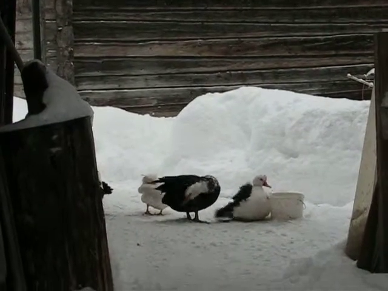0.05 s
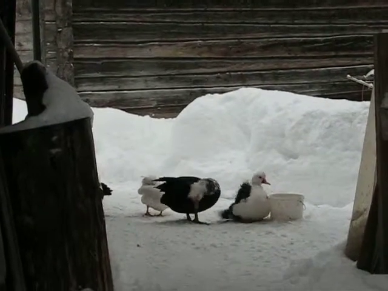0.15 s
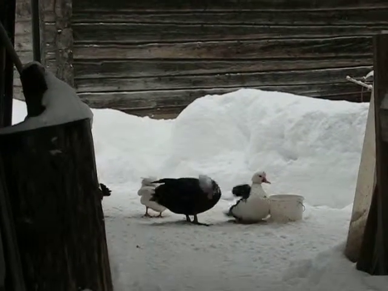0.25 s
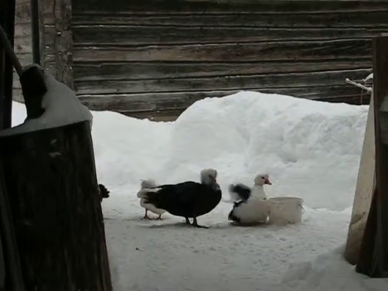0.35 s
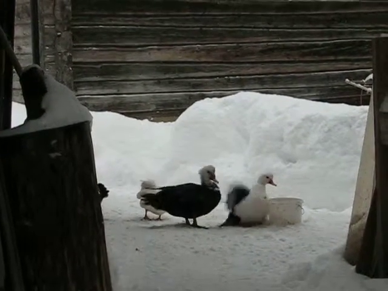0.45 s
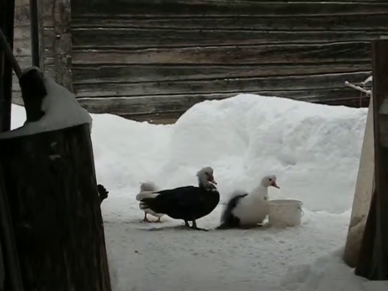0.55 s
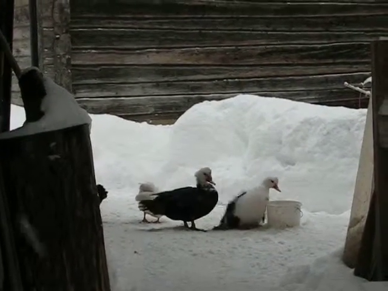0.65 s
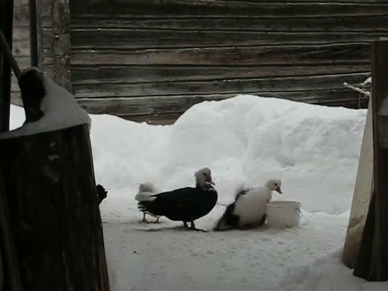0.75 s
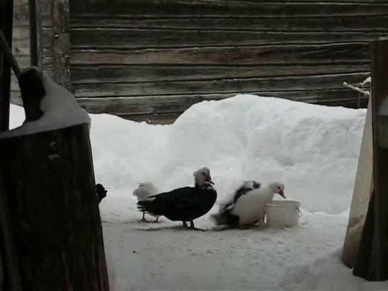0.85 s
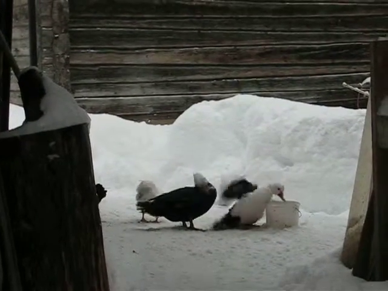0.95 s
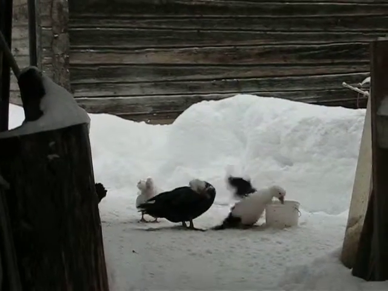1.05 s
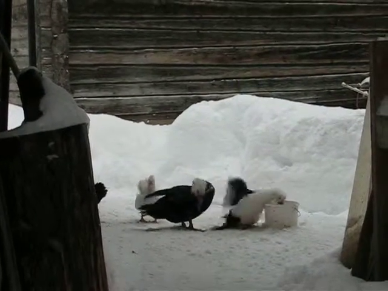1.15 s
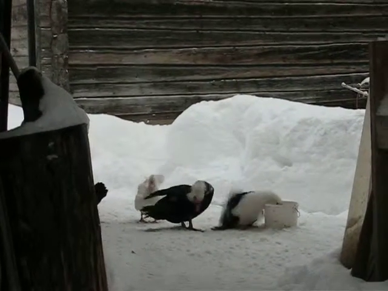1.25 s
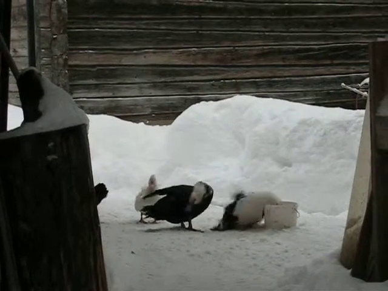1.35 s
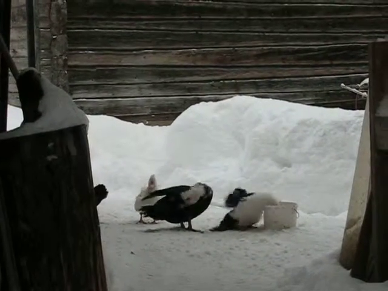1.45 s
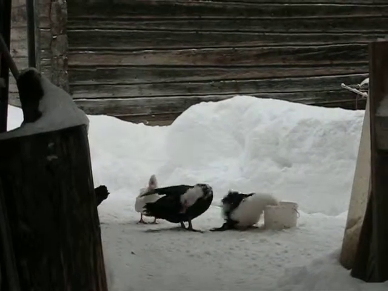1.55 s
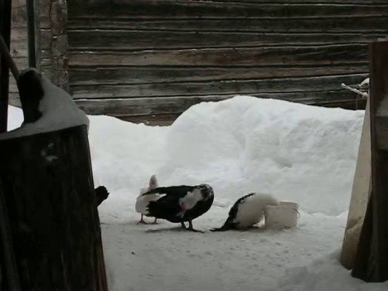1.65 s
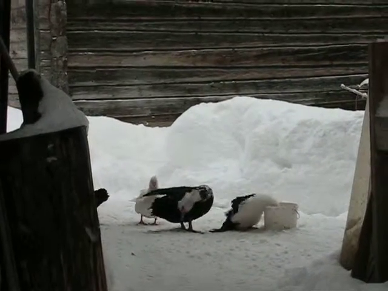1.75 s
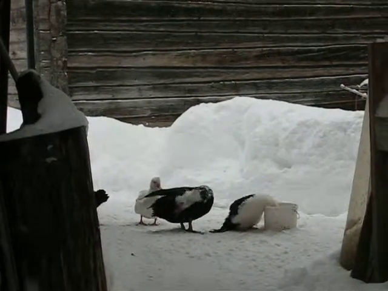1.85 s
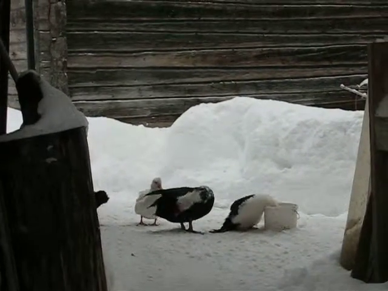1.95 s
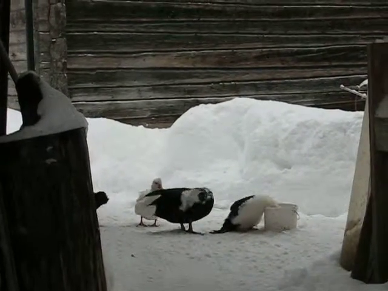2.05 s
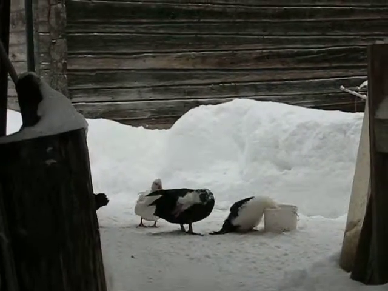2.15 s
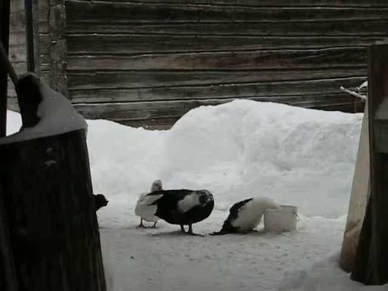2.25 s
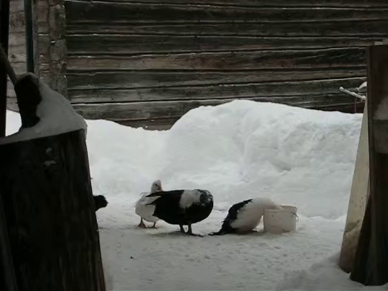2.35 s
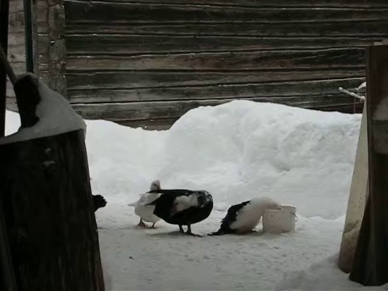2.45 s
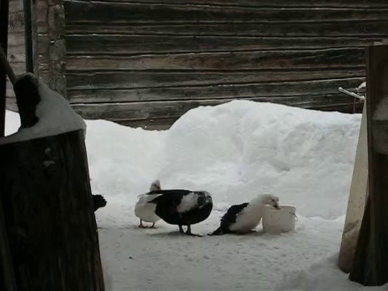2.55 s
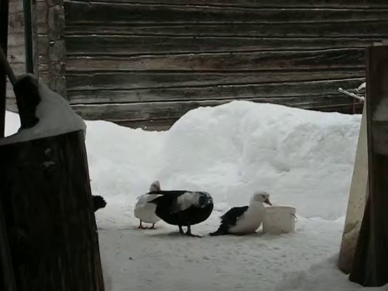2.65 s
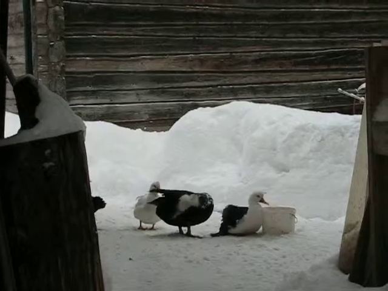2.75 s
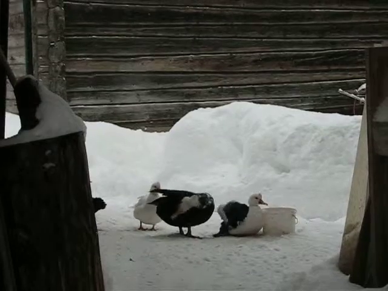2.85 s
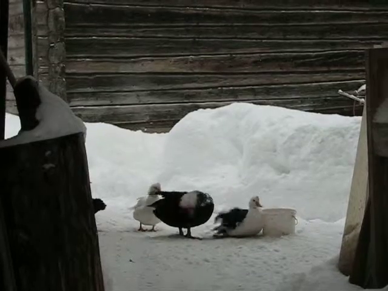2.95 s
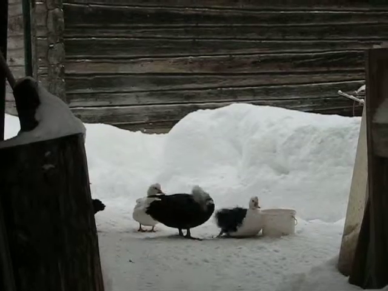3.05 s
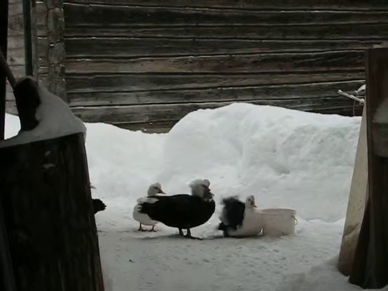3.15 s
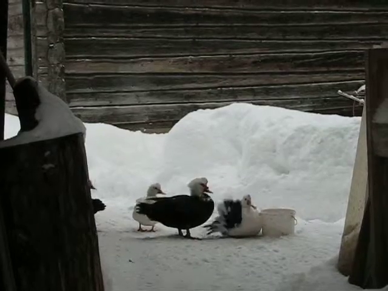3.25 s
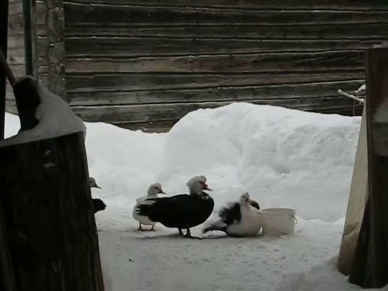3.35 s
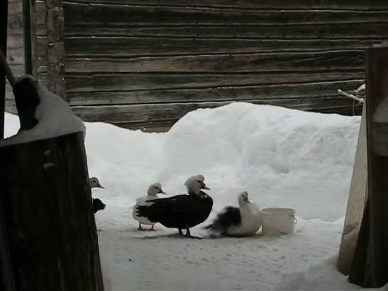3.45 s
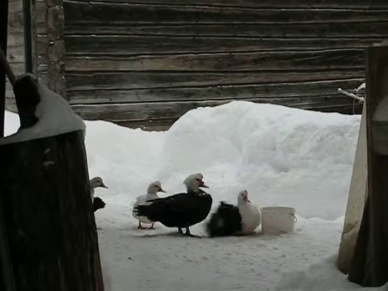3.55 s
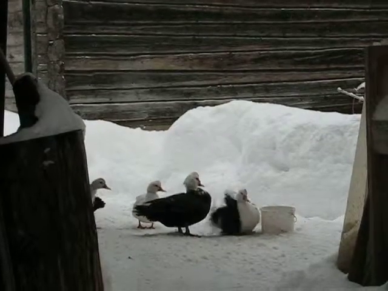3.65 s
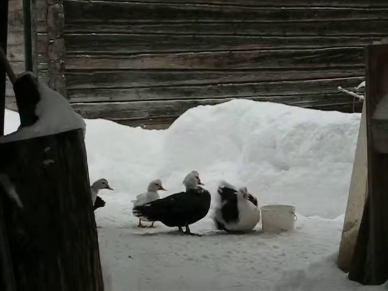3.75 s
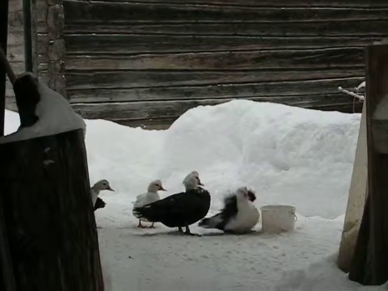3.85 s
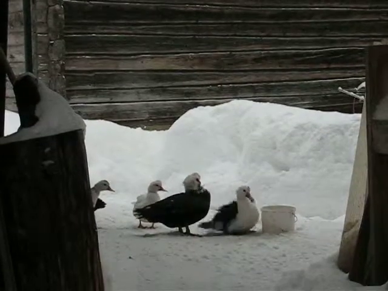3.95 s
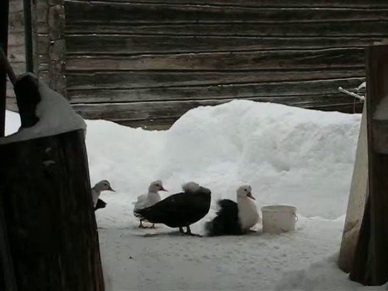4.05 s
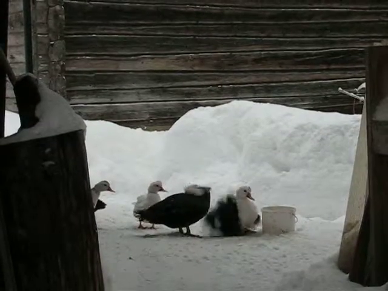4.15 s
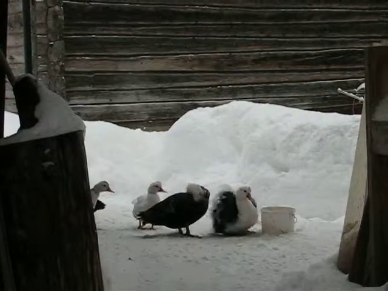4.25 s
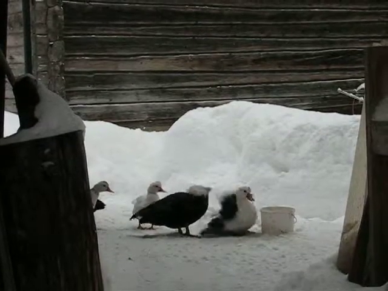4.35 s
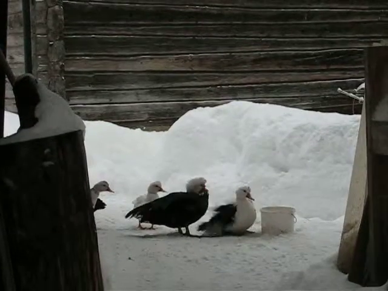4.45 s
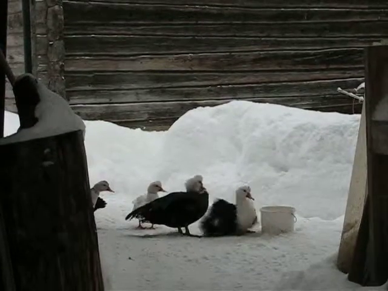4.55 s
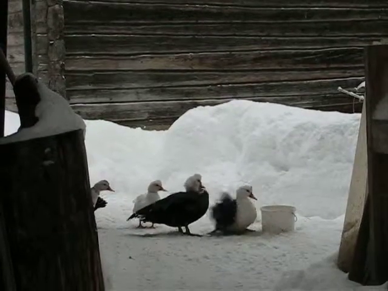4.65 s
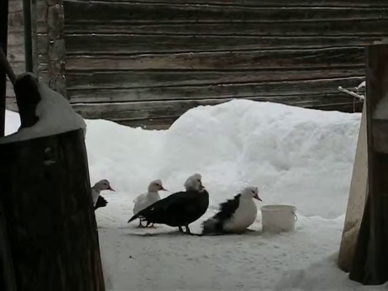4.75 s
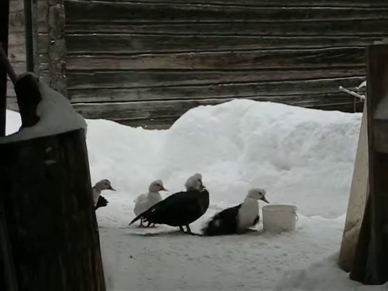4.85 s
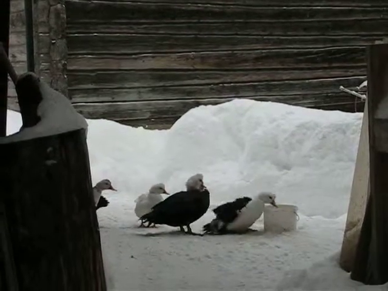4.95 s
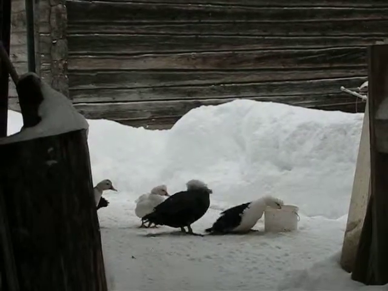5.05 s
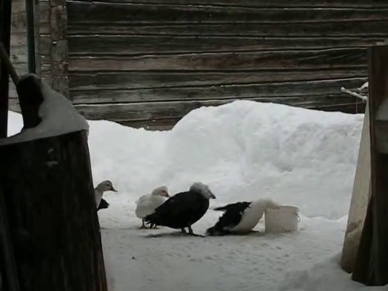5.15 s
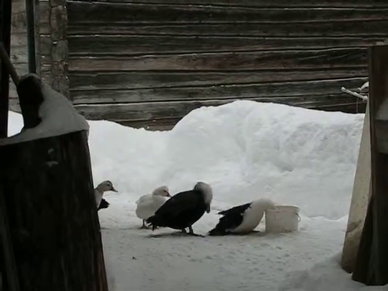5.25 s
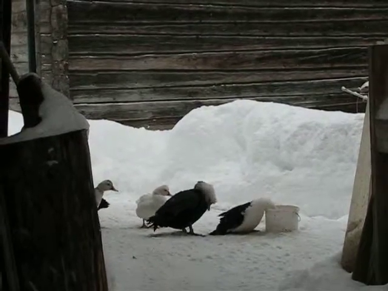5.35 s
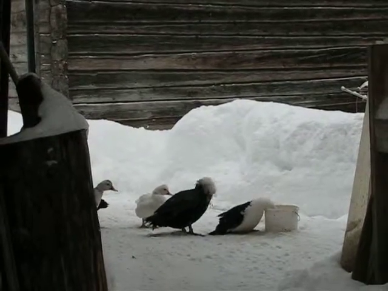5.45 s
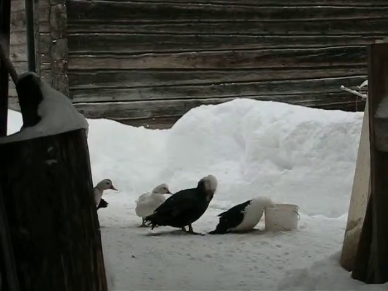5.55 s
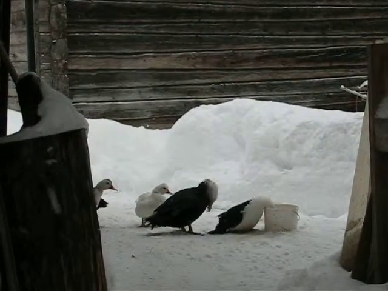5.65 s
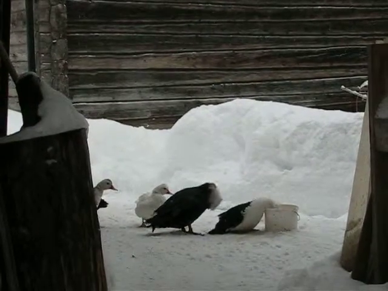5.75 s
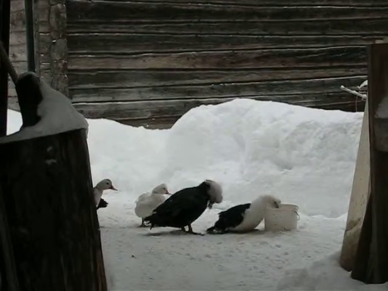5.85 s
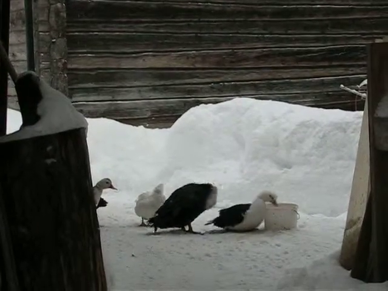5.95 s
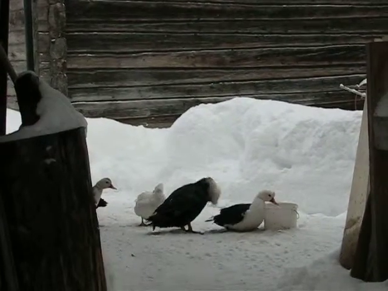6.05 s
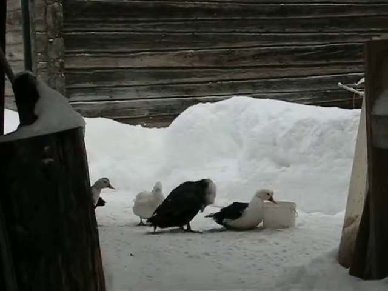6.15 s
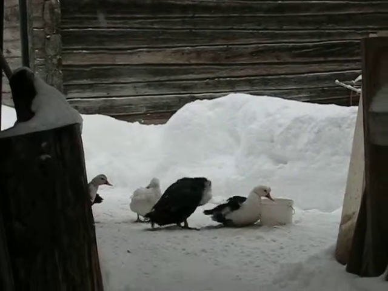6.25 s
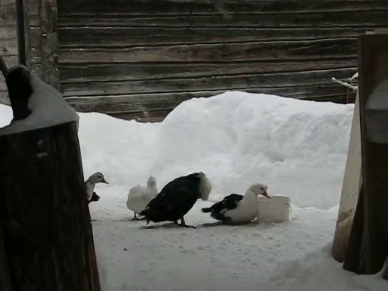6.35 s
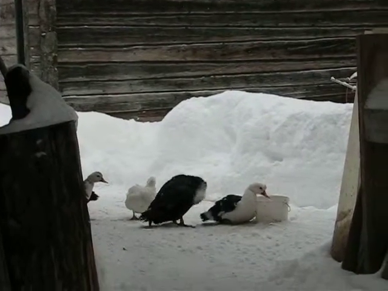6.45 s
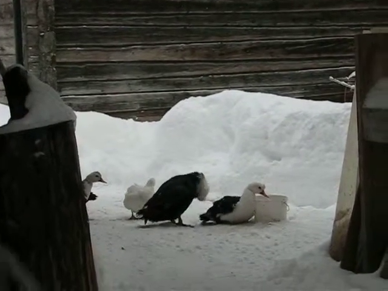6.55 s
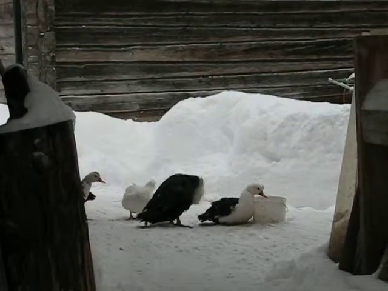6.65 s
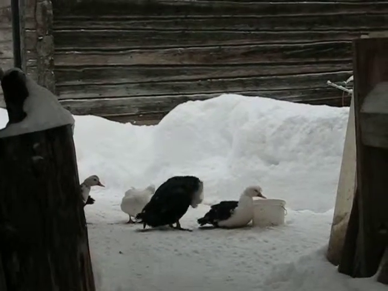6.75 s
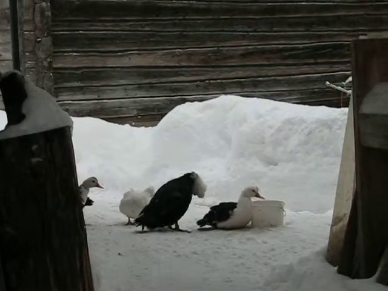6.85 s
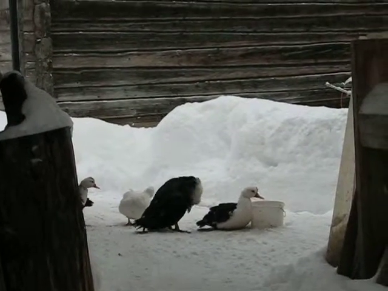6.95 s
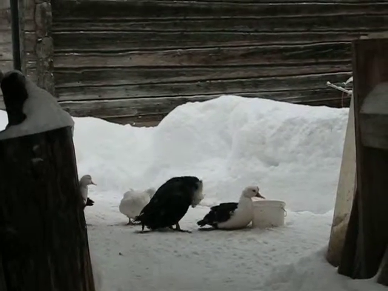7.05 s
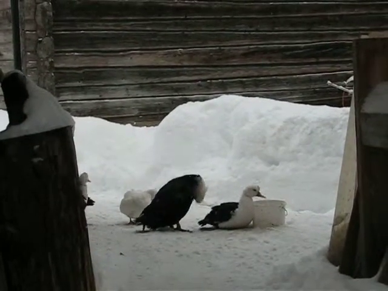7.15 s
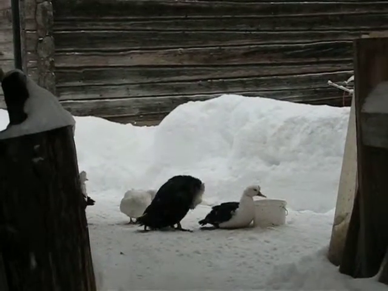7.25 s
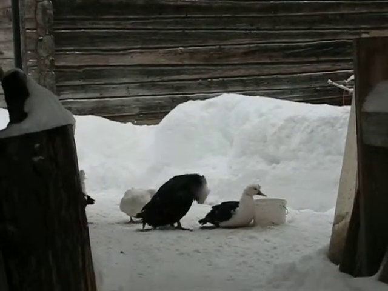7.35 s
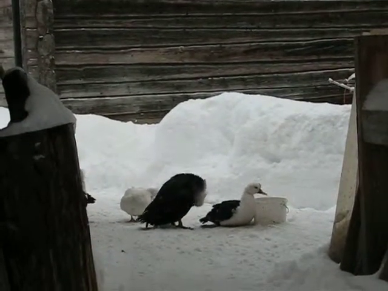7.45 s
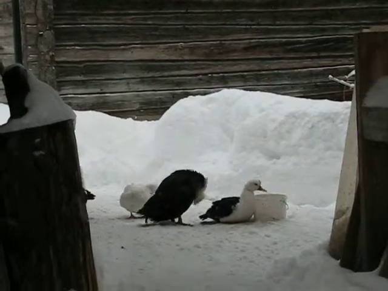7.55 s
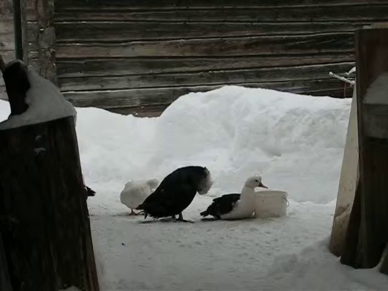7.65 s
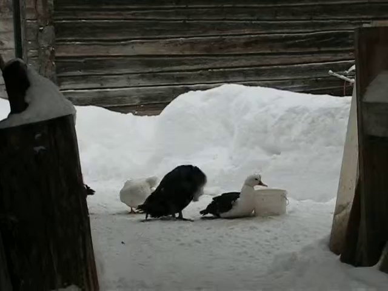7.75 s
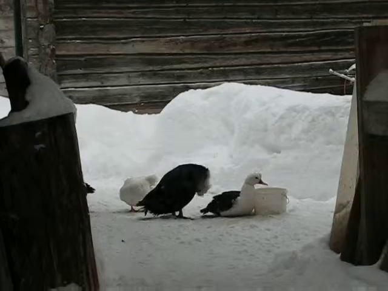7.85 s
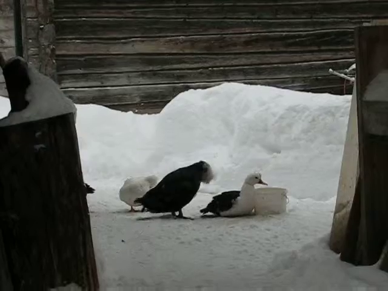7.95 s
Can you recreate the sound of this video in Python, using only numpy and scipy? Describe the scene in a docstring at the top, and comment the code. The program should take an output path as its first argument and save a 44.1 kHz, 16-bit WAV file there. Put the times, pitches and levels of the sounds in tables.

```python
"""Ducks on packed snow before a log wall; a nearly still yard and a faint, thin whine lie under everything.
First one beats its wings eight times a second: each stroke is a burst of feather clicks with a puff of
filtered noise, over a dry rustle, while slaps and snapping quills are short decaying bursts.
Then a bill knocks in a plastic feed tub (damped sines) and nibbles at feathers (band-passed grains).
The plumage is shaken out with further strokes; last come more knocks, light dabbling and three soft peeps."""
import sys
import numpy as np
from scipy import signal
from scipy.fft import rfft, irfft, next_fast_len
from scipy.io import wavfile
from scipy.ndimage import uniform_filter1d, map_coordinates

SR = 44100
rng = np.random.default_rng(int(sys.argv[2]) if len(sys.argv) > 2 else 0)


def transcribe(signal):
    """Save signal, clipped to [-1, 1], as a 16-bit WAV file at the path in sys.argv[1]."""
    frames = np.atleast_2d(signal).T
    limited = np.clip(frames, -1, 1)
    pcm = np.round(limited * 32767).astype(np.int16)
    wavfile.write(sys.argv[1], SR, pcm)


N = 353137
TIME = np.arange(N) / SR  # s

# left-right likeness of the feather sounds: f/Hz, coherence
DUCK_COHERENCE = [(130, 1), (640, 1), (1400, 0.95), (3100, 0.87), (6800, 0.85), (15000, 0.15)]


def amp(db):
    """Level to amplitude: 20 dB is a factor of ten in pressure."""
    return 10 ** (np.asarray(db) / 20)


def unit(x):
    """Normalisation to an rms amplitude of 1."""
    return x / np.sqrt(np.mean(x ** 2) + 1e-20)


def along(points, hz):
    """Interpolation of (f/Hz, value) points on a logarithmic frequency axis, as pitch is heard."""
    f, v = np.transpose(points)
    return np.interp(np.log(hz + 1), np.log(f + 1), v)


def filtered(x, response):
    """Linear filtering: the spectrum of x times a complex response of frequency."""
    m = next_fast_len(N + SR // 2)
    spectrum = rfft(x, m) * response(np.fft.rfftfreq(m, 1 / SR))
    return irfft(spectrum, m)[..., :N]


def coloured(x, spectrum):
    """Minimum-phase filtering: a causal pulse of the given spectrum that keeps the power of white noise."""
    size = 4096
    cepstrum = irfft(np.log(amp(along(spectrum, np.fft.rfftfreq(size, 1 / SR)))))
    # folding the cepstrum onto positive time makes the pulse causal
    cepstrum[1:size // 2] *= 2
    cepstrum[size // 2 + 1:] = 0
    pulse = irfft(np.exp(rfft(cepstrum)))[:size // 2]
    return signal.fftconvolve(x, pulse[None] / np.linalg.norm(pulse), axes=1)[:, :N]


def spread(pair, alike):
    """Interaural coherence: two unrelated signals mixed as sum and difference into left and right."""
    turn = lambda hz: np.arccos(np.clip(along(alike, hz), -1, 1)) / 2
    mid, side = filtered(pair, lambda hz: np.array([np.cos(turn(hz)), np.sin(turn(hz))]))
    return np.array([mid + side, mid - side])


def wobble(rate):
    """Slow random modulation: a smooth curve through `rate` random knots a second."""
    knots = rng.standard_normal(int(N * rate / SR) + 4)
    return map_coordinates(knots, [TIME * rate])


def add(track, s, sound):
    """Superposition: a sound is summed into a track at time s."""
    part = track[max(round(s * SR), 0):][:len(sound)]
    part += sound[:len(part)]


def yard():
    """Stationary background noise: faint outdoor air and hiss, drifting slowly in level."""
    # spectrum of air and hiss: f/Hz, relative level/dB
    yard_spectrum = [(20, -2.5), (90, -2.5), (200, 1), (320, 2.5), (410, 7), (550, -1), (650, 7),
                     (750, 0.5), (870, 4), (1250, -3.5), (3000, -5), (7500, -7), (10000, -11), (16000, -18)]
    # left-right likeness: f/Hz, coherence
    yard_coherence = [(60, 0.64), (180, 0.8), (550, 0.68), (1650, 0.41), (4970, 0.093), (15000, 0.19)]
    air = spread(coloured(rng.standard_normal((2, N)), yard_spectrum), yard_coherence)
    return air * amp(-60 + 0.79 * wobble(1.95))


def whine():
    """Periodic phase reset: one thin sine restarts thirty times a second, which gives it sidebands."""
    tone_hz, restart_hz = 8263, 30
    return np.sqrt(2) * amp(-65.5) * np.sin(2 * np.pi * tone_hz * (TIME % (1 / restart_hz)))


def nook(x):
    """Resonance and diffuse reflection: log wall and snow bank ring low and return a weak, short scatter."""
    # resonances between wall and snow bank: f/Hz, bandwidth/Hz, level re direct sound/dB
    resonances = [(91, 15.6, -0.5), (214, 21, -1), (446, 30, -2), (680.7, 23, 2), (974, 39, -18),
                  (1540, 60, -12), (1766, 35, -11)]
    ring = filtered(x, lambda f: 1 + sum(amp(db) * 1j * f * width / (centre * centre - f * f + 1j * f * width)
                                         for centre, width, db in resonances))
    t = np.arange(SR // 4) / SR
    tail = rng.standard_normal((2, len(t))) * amp(-60 * t / 0.093) * (t > .004)
    scatter = signal.fftconvolve(x, tail / np.linalg.norm(tail[0]), axes=1)[:, :N]
    # long waves arrive alike at left and right
    return ring + amp(-11.5) * spread(scatter, [(200, 0.99), (1500, 0.35), (6000, 0.3)])


def peeps():
    """Tone bursts: short, faint sines under Gaussian envelopes."""
    # soft notes: t/s, level/dB, f/Hz
    notes = [(6.352, -65, 1435), (6.415, -60.5, 2860), (6.452, -65, 2890)]
    track = np.zeros(N)
    for s, db, hz in notes:
        envelope = np.exp(-((TIME - s) / 0.0054) ** 2)
        track += np.sqrt(2) * amp(db) * envelope * np.sin(2 * np.pi * hz * TIME)
    return track


def touches(bouts, gap, db):
    """Irregular succession: rows (t/s, level/dB, f/Hz) of light bill touches, scattered through each bout."""
    scatter_db, scatter_octaves = -1, 0.25  # one standard deviation
    slots = [(s, hz) for start, end, hz in bouts for s in np.arange(start, end, gap)]
    chance = rng.standard_normal((len(slots), 3))
    return [(s + gap * abs(late) / 2, db + scatter_db * loud, hz * 2 ** (scatter_octaves * high))
            for (s, hz), (late, loud, high) in zip(slots, chance)]


def pecks():
    """Damped vibration: bill on feed and tub rings with an overtone, led by a dry noise tick."""
    # firm pecks: t/s, relative level/dB, f/Hz, 60 dB decay time/s, tick level re ring/dB
    firm = [(1.847, -44.5, 440, .011, -14), (2.3126, -40.5, 427, 0.019, -8.5),
            (2.487, -37, 400, 0.017, -9.5), (2.532, -37, 414, .018, -13), (2.6033, -47, 392, 0.029, -11),
            (2.686, -44.5, 390, 0.02, -16), (2.74, -36, 397, 0.014, -9), (2.769, -44, 440, .014, -13),
            (5.0143, -41.5, 400, 0.034, -22), (5.565, -41, 380, .018, -9), (5.9085, -41.5, 414, .013, -15),
            (5.984, -40, 410, 0.0086, -16), (6.2402, -41.5, 1100, .014, -6), (6.5443, -44, 950, 0.019, -12),
            (6.697, -42, 1140, 0.014, -10), (6.8272, -42.5, 1750, 0.0063, 3),
            (6.8955, -39.5, 520, .009, -10), (7.155, -44.5, 735, 0.011, -12),
            (7.2785, -43, 780, 0.0076, -12), (7.378, -37, 1170, .018, -10.5),
            (7.4264, -42, 1710, .012, -14), (7.4348, -40, 940, 0.057, -3)]
    # light dabbling: start t/s, end t/s, typical f/Hz
    dabble_bouts = [(5.3, 8.0, 700)]
    gap_s, dabble_db, dabble_t60_s, dabble_tick_db = .14, -48.5, 0.0093, -10
    knocks, ticks, t = np.zeros(N), np.zeros(N), np.arange(SR // 15) / SR
    dabbles = [(*touch, dabble_t60_s, dabble_tick_db) for touch in touches(dabble_bouts, gap_s, dabble_db)]
    for s, db, hz, t60, tick_db in firm + dabbles:
        ring = np.sin(2 * np.pi * hz * t) + 0.23 * np.sin(2 * np.pi * hz * 1.4 * t)
        add(knocks, s, amp(db - 1 - 60 * t / t60) * ring)
        add(ticks, s, amp(db + tick_db + 4.0 - 60 * t / .008) * rng.standard_normal(len(t)))
    # the small tub radiates no bass
    knocks = filtered(knocks, lambda hz: (1j * hz / (130 + 1j * hz)) ** 2)
    tick_spectrum = [(100, -0.5), (600, 6.5), (1700, 3.5), (4500, -4), (6500, -29), (16000, -35)]
    return knocks + coloured(ticks[None], tick_spectrum)[0]


def barbs(rate, size_db, smooth_db):
    """Stick-slip: barbs slide over each other in a stream of tiny, uneven clicks on a smooth hiss."""
    sizes = amp(size_db * np.minimum(rng.exponential(size=N), np.pi))
    clicks = (rng.random(N) < rate / SR) * sizes
    rough = unit(clicks * rng.standard_normal((2, N)))
    return unit(rough + amp(smooth_db) * rng.standard_normal((2, N)))


def preening():
    """Band-passed friction noise: each nibble is a soft, grainy swish around its own pitch."""
    # bill drawn firmly through the feathers: t/s, relative level/dB, centre f/Hz
    draws = [(1.976, -57.5, 5300), (2.24, -54.5, 4700), (2.48, -58, 5000), (2.548, -53, 5140),
             (2.768, -54.5, 5770), (6.235, -60, 6950), (6.39, -59, 4430)]
    # light nibbling: start t/s, end t/s, typical centre f/Hz
    nibble_bouts = [(1.8, 2.9, 4900), (5.2, 6.8, 3380)]
    gap_s, nibble_db = .2, -65.5
    track, t = np.zeros(N), np.arange(-SR // 20, SR // 20) / SR
    octaves = lambda hz: np.log2((np.fft.rfftfreq(len(t), 1 / SR) + 1) / hz)
    grain = barbs(rate=1700, size_db=7, smooth_db=1.0)[0]
    for s, db, hz in draws + touches(nibble_bouts, gap_s, nibble_db):
        band = (1 + (octaves(hz) / 1.55) ** 2) ** 3.2
        swish = irfft(rfft(grain[round(s * SR):][:len(t)]) / band, len(t))
        add(track, s + t[0], amp(db - 1.5) * unit(swish) / np.cosh(t / 0.0091))
    return track


def snaps():
    """Elastic release: a quill springs free in a rough click of a few cycles."""
    # single quills flicking past each other: t/s, relative level/dB, f/Hz
    flicks = [(0.5426, -18.5, 5240), (0.7292, -27, 4260), (0.7809, -10.5, 6900), (1.5074, -24, 3020),
              (1.609, -23, 6900), (2.233, -36.5, 6500), (4.1015, -28, 6800), (4.2293, -25, 5800),
              (4.386, -26, 3300), (4.521, -28, 3300), (4.933, -22.5, 3500), (6.789, -39.5, 4300)]
    low_hz, top_hz = 1860, 10500  # the band in which a thin quill clicks
    track, t = np.zeros(N), np.arange(SR // 50) / SR
    for s, db, hz in flicks:
        click = np.sin(2 * np.pi * hz * t) + .5 * rng.standard_normal(len(t))
        add(track, s, amp(db + 4 - 60 * t / .003) * (1 - np.exp(-t / .00012)) * click)
    return filtered(track, lambda hz: 1 / (1 + (hz / top_hz) ** 6 + (low_hz / (hz + 1)) ** 4))


def pressure(times, levels, rise, t60, tail_db, tail_t60):
    """Energy summation: contacts swell, collapse and trail off as feathers slide on; their powers add."""
    power, lead = np.zeros(N), SR // 20
    t = np.arange(-lead, SR // 4) / SR
    after = np.maximum(t, 0)
    swell = amp(60 * np.minimum(t, 0) / rise)
    shape = swell * (amp(-60 * after / t60) + amp(tail_db - 60 * after / tail_t60))
    for s, db in zip(times, levels):
        add(power, s - lead / SR, (amp(db) * shape) ** 2)
    return np.sqrt(power)


def slaps():
    """Impact: the flat of the wing lands with a hard pat (damped sine) and a dull crunch (grainy noise)."""
    # wing striking snow or body: t/s, relative level/dB
    landings = [(0.242, -56), (0.526, -46), (0.636, -41.5), (0.7561, -37), (0.86, -37), (0.9897, -39.5),
                (1.1009, -38), (1.23, -38.5), (1.508, -44.5), (3.765, -44.5), (4.193, -46), (4.386, -42),
                (4.595, -40.5)]
    # spectrum of the crunch: f/Hz, relative level/dB
    crunch_spectrum = [(60, -4.5), (200, -3.5), (600, -2.5), (1000, 1), (1300, -8), (1700, -3.5),
                       (2900, -2.5), (4500, -11.5), (8000, -14), (16000, -37)]
    times, levels = np.transpose(landings)
    pats, t = np.zeros(N), np.arange(SR // 30) / SR
    for s, db in landings:
        hz = 1000 * np.exp(.15 * rng.standard_normal())
        add(pats, s, amp(db + 6 - 60 * t / .012) * np.sin(2 * np.pi * hz * t))
    blow = pressure(times, levels + 2, rise=.001, t60=0.015, tail_db=-3.5, tail_t60=0.16)
    crunch = coloured(blow * barbs(rate=3000, size_db=-0.5, smooth_db=0), crunch_spectrum)
    return pats + spread(crunch, DUCK_COHERENCE)


def strokes():
    """Contact sequence: each beat gives two claps, a slide and an upstroke (t/s, crackle/dB, air puff/dB)."""
    # wingbeats: t/s, crackle level/dB, air puff level/dB, second wing's lag t/s,
    # its crackle level/dB, upstroke crackle level/dB (all levels relative)
    beats = [(0.32, -44, -45.5, 0.016, -37.5, -42.5), (0.4313, -37, -40.5, 0.014, -35, -45),
             (0.536, -35.5, -36.5, 0.019, -32, -55), (0.665, -29.5, -40, 0.016, -37, -47),
             (0.78, -29.5, -39, 0.0086, -28.5, -60), (0.8943, -26, -37.5, 0.0094, -31, -55),
             (1.015, -27.5, -38.5, .006, -35, -54), (1.1349, -27, -34, 0.007, -35, -44),
             (1.2555, -28.5, -35, 0.0063, -29, -48), (1.3853, -33.5, -40.5, 0.0062, -33, -42),
             (1.529, -49, -46, 0.0213, -47, -49), (3.2571, -46, -51, 0.027, -42, -52),
             (3.379, -42.5, -60, 0.029, -43.5, -59), (3.4643, -49, -49.5, 0.023, -42.5, -43),
             (3.589, -49, -41, 0.036, -39, -47), (3.7, -42.5, -44, 0.0059, -39.5, -41),
             (3.828, -44, -39.5, 0.029, -38, -44), (3.9487, -40, -36, .036, -39, -45.5),
             (4.0739, -34.5, -34.5, 0.0272, -33, -44), (4.197, -39.5, -37, 0.034, -33.5, -36.5),
             (4.321, -40, -36.5, 0.017, -33.5, -51), (4.4657, -32.5, -33, 0.016, -37, -40.5),
             (4.5979, -40, -43.5, 0.0072, -40, -52), (4.7094, -48, -41.5, 0.023, -43.5, -49),
             (4.869, -65, -53, 0.035, -49, -54)]
    spill_db_per_s = 260  # the later the second wing, the less air is left for it to push
    slide_s, slide_db = 0.0198, -8.5  # the wings then slide off the flank: delay, level re second clap
    upstroke_s, upstroke_air_db = .068, -16.5  # they brush past again: delay, air puff re its crackle
    rows = []
    for s, crackle_db, puff_db, lag, second_db, up_db in beats:
        left_db = puff_db - spill_db_per_s * lag
        rows += [(s, crackle_db, puff_db), (s + lag, second_db, left_db),
                 (s + lag + slide_s, second_db + slide_db, left_db + slide_db),
                 (s + upstroke_s, up_db, up_db + upstroke_air_db)]
    return rows


def thumps():
    """Volume displacement: each contact shoves the air in a soft, low push at its own random pitch."""
    track, t = np.zeros(N), np.arange(SR // 10) / SR
    contacts = strokes()
    pitches = 200 * np.exp(.17 * rng.standard_normal(len(contacts)))
    for (s, _, db), hz in zip(contacts, pitches):
        push = np.sin(2 * np.pi * hz * t) * (1 - np.exp(-t / .005)) * amp(-60 * t / .04)
        add(track, s - .003, amp(db + 4) * push)
    # air slips round the wing, so the deepest bass cancels
    return filtered(track, lambda hz: (1j * hz / (75 + 1j * hz)) ** 2)


def ruffle():
    """Amplitude envelopes: gains of rustle and stirred air, silent outside the bouts of motion."""
    # one curve for each bout: t/s, rustle relative level/dB, stirred air relative level/dB
    bouts = [
        [(0, -64, -53.5), (.15, -55.5, -55), (.31, -53, -53), (.56, -47, -50.5), (.73, -47, -49),
         (1.24, -49, -54.5), (1.45, -53, -54), (1.6, -56, -73), (1.8, -70, -83)],
        [(2.68, -62.5, -84), (3.05, -54.5, -65), (3.6, -47.5, -55.5), (4.09, -46.5, -56), (4.3, -44.5, -55),
         (4.66, -47.5, -55.5), (4.84, -54.5, -61.5), (4.96, -53, -69), (5.08, -69.5, -78)],
    ]
    gains = np.zeros((2, N))
    for bout in bouts:
        s, *levels = np.transpose(bout)
        gains += [amp(np.interp(TIME, s, db, left=-np.inf, right=-np.inf)) for db in levels]
    return gains


def patchy(x, depth_db):
    """Spectral variation: feathers differ in colour, so random gains span a kilohertz and milliseconds."""
    z = signal.stft(x, nperseg=128)[2]
    field = rng.standard_normal(z.shape[1:])
    field = uniform_filter1d(field, size=3, axis=0)
    field = uniform_filter1d(field, size=5, axis=1)
    return unit(signal.istft(z * amp(depth_db * unit(field)), nperseg=128)[1][:, :N])


def wings():
    """Friction and air flow: strokes crackle in the vanes and puff air; loose feathers rustle in between."""
    # spectrum of the vanes: f/Hz, relative level/dB
    feather_spectrum = [(300, -43), (800, -18.5), (1250, -14.5), (1700, -5.5), (2030, -9), (2500, -3.5),
                        (3200, -2), (4900, -6), (6000, -2), (6900, 2), (8000, -4), (9500, -13),
                        (12500, -18.5), (16000, -24)]
    # spectrum of the moved air: f/Hz, relative level/dB
    air_spectrum = [(20, -19), (55, -16), (95, -8), (125, -11.5), (165, -4.5), (210, -4.5), (290, -5),
                    (600, -9.5), (1000, -8), (1300, -16.5), (3000, -14), (8000, -84)]
    s, crackle_db, puff_db = np.transpose(strokes())
    rustle, stir = ruffle()
    clap = pressure(s, crackle_db + .5, rise=.014, t60=.018, tail_db=-9, tail_t60=.14)
    puff = pressure(s, puff_db - 4.5, rise=0.046, t60=0.078, tail_db=-23.5, tail_t60=0.093)
    grain = barbs(rate=2500, size_db=3, smooth_db=0)
    loose = amp(-1.2 + 1.53 * wobble(70)) * rustle * patchy(grain, depth_db=3)
    # the rustle has its own treble tilt
    tilt = [(1000, -2.8), (3000, 0.5), (8000, 2.0), (12000, 1.5)]
    loose = filtered(loose, lambda hz: amp(along(tilt, hz)))
    crackle = clap * patchy(barbs(rate=6000, size_db=2.5, smooth_db=-2), depth_db=1.7)
    air = (puff + amp(-3) * stir) * barbs(rate=2800, size_db=2.0, smooth_db=2)
    feathers = coloured(crackle + loose, feather_spectrum) + coloured(air, air_spectrum)
    return spread(feathers, DUCK_COHERENCE) + thumps()


def scene():
    """Superposition of sources: ducks in their nook, the yard around them, the whine on top."""
    # stereo balance: f/Hz, left minus right level/dB
    balance = [(60, -1), (200, -0.5), (700, -2.3), (1300, 0), (2400, -3), (4400, -1.5), (6500, 0),
               (8300, -4), (12000, 2)]
    ducks = nook(wings() + slaps() + snaps() + preening() + pecks() + peeps())
    lean = lambda hz: amp(np.array([[.5], [-.5]]) * along(balance, hz))
    return filtered(ducks + yard(), lean) + whine() * amp([[-5], [3]])


def record(dry):
    """Band limitation: an ideal low-pass removes everything from 15.9 kHz up."""
    return filtered(dry, lambda hz: hz < 15900)


dry = scene()
out = record(dry)
transcribe(out)
```